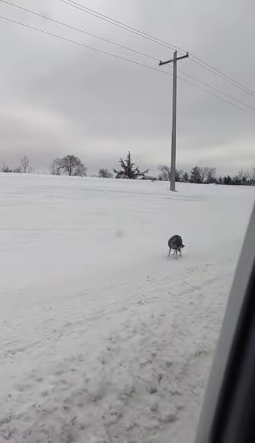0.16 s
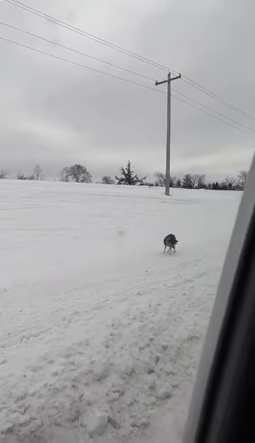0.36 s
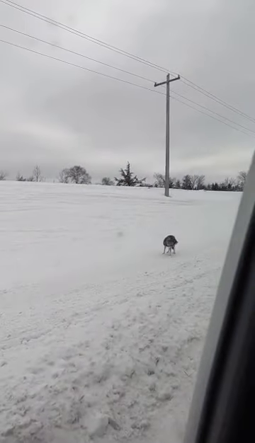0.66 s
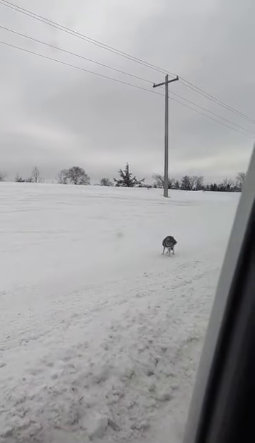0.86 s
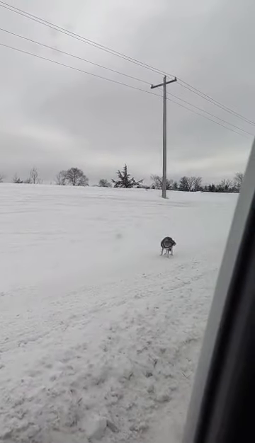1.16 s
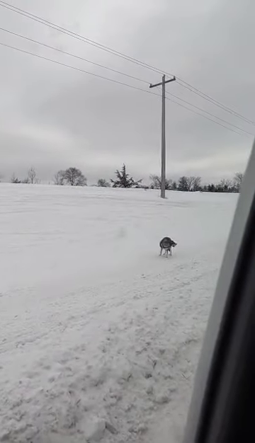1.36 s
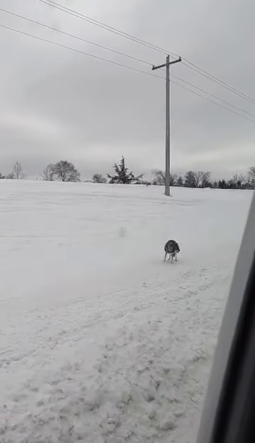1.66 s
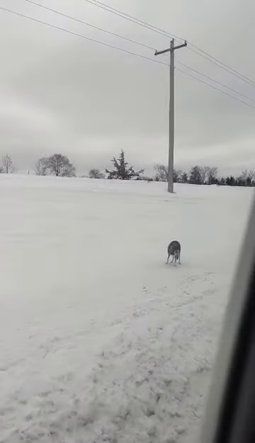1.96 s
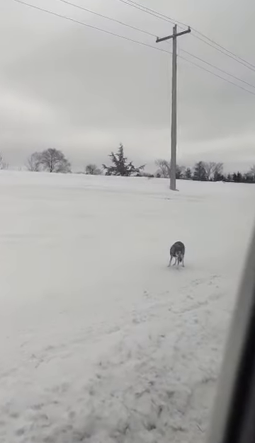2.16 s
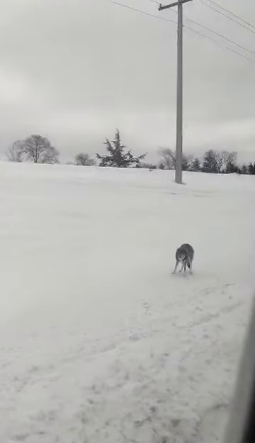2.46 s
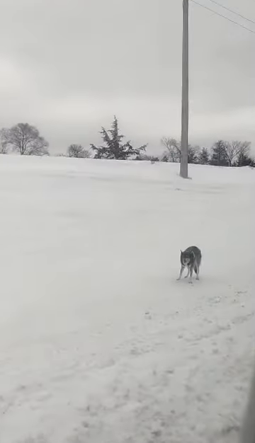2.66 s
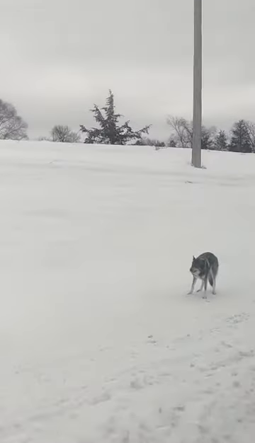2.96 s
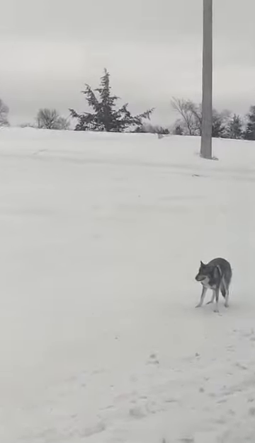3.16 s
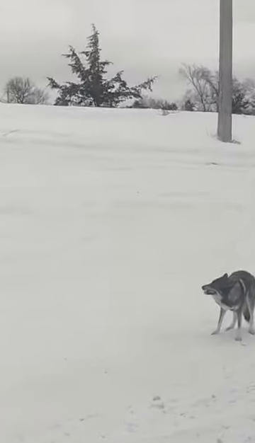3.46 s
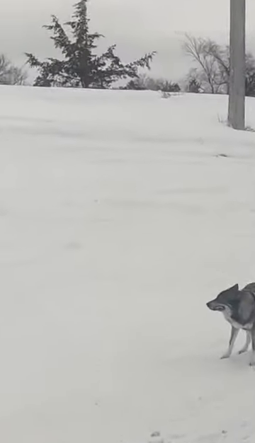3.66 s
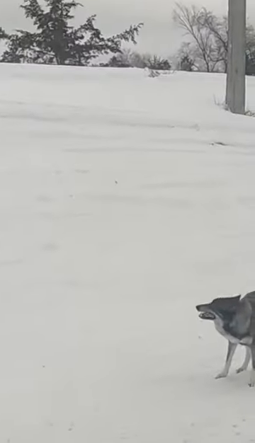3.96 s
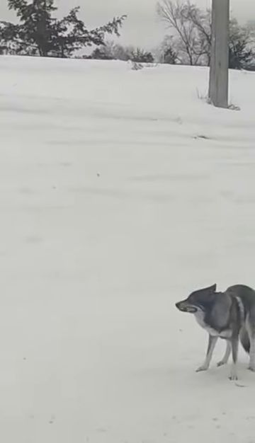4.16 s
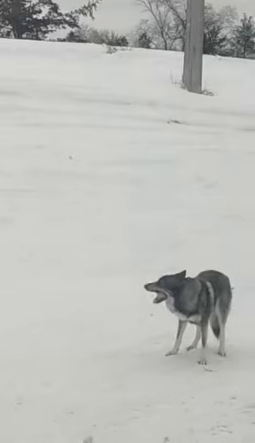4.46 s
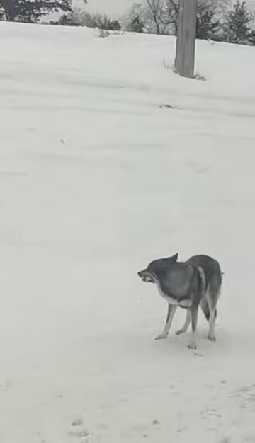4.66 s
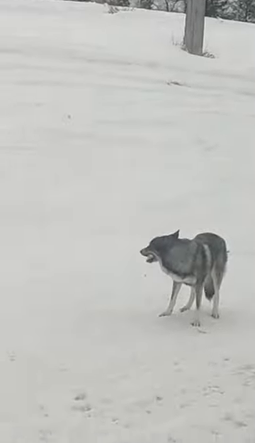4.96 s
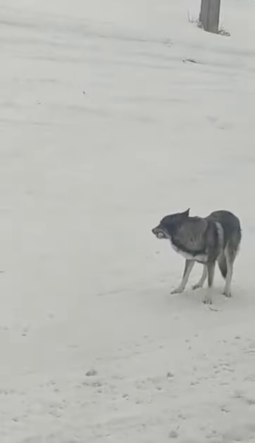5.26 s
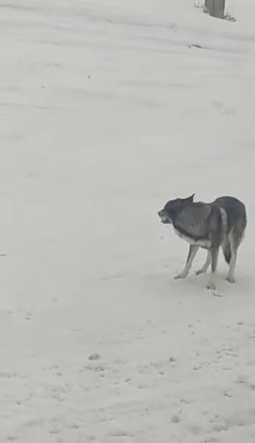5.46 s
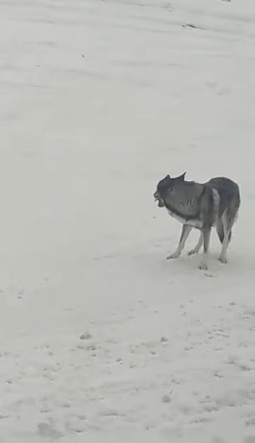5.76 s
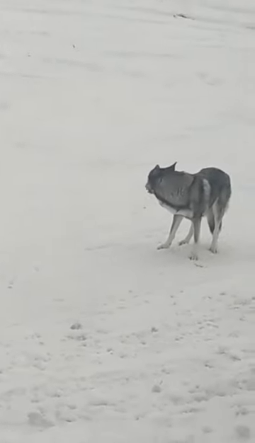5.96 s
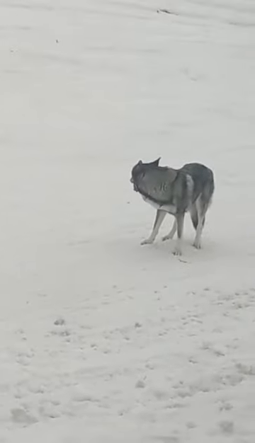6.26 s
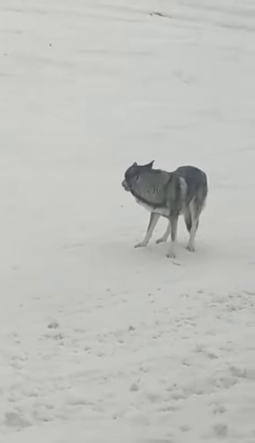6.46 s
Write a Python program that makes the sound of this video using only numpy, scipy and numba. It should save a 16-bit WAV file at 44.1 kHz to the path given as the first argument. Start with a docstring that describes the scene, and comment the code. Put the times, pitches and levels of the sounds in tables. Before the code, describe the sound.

A handheld phone in a car picks up a soft, muffled idle and very close handling noise: two bursts of deep bumps, gritty skin rubbing and a cluster of short squeaks, then a few last knocks. Road roar grows steadily outside the open window, peaks as a vehicle sweeps by with hissing wet tyres and low cabin boom, and fades, leaving light ticks and faint rubbing.

```python
"""Inside a parked car with a window open, the engine idles while hands rub and bump the case of a held phone.
Another vehicle comes along the road, roars past and fades, jolting the cabin with a few thumps. Shaped noise
makes its tyres, its spray and the idle; the cabin booms at its own resonances. Skin on the case is grainy
noise with ticks and gliding squeaks. Each bump or thump is a dying low swing plus a ringing."""
import sys
import numpy as np
from scipy import signal
from scipy.fft import rfft, irfft, next_fast_len
from scipy.io import wavfile
from scipy.ndimage import uniform_filter1d
from numba import njit

SR = 44100
rng = np.random.default_rng(int(sys.argv[2]) if len(sys.argv) > 2 else 0)


def store_wav(level_fs):
    """Save 16-bit WAV to argv[1]."""
    pcm = np.round(np.clip(np.atleast_2d(level_fs), -1, 1) * 32767)
    wavfile.write(sys.argv[1], SR, pcm.T.astype(np.int16))


N = 291501
T = np.arange(N) / SR
SIZE = next_fast_len(N, True)
HZ = np.fft.rfftfreq(SIZE, 1 / SR)
PORT_LAG_S = 14 / SR  # shared sound reaches the right port this much later


def undb(db):
    """Turn decibels into a plain amplitude factor."""
    return 10 ** (np.asarray(db) / 20)


def on_log_axis(table):
    """Read a (frequency [Hz], value) table at every frequency, in straight lines over log frequency."""
    hz, value = np.transpose(table)
    return np.interp(np.log(HZ + 0.0011), np.log(hz), value)


def unit(x):
    """Scale a sound to an RMS level of 1."""
    return x / np.sqrt(np.mean(x ** 2))


def walk(rate):
    """Wander at random: levels held 1 / rate seconds and smoothed twice, with a spread near 1."""
    hold = int(SR / rate)
    steps = np.repeat(rng.standard_normal(N // hold + 1), hold)
    smooth = uniform_filter1d(uniform_filter1d(steps, hold), hold)
    return 1.74 * smooth[:N]


@njit
def moving_band(x, hz, width):
    """State-variable band-pass filter whose centre moves; its gain is 1 at the centre."""
    y, band, low = np.empty(len(x)), 0., 0.
    for i in range(len(x)):
        g, k = np.tan(np.pi * hz[i] / SR), width / hz[i]
        v = (band + g * (x[i] - low)) / (1 + g * (g + k))
        band, low, y[i] = 2 * v - band, low + 2 * g * v, k * v
    return y


# How alike the sound is at the phone's two ports: (frequency [Hz], share common to both [0 to 1])
PORT_LIKENESS = [(20, 1), (250, 1), (500, 0.88), (1000, 0.64), (2000, 0.14), (13500, 0.33)]


def noise(gain):
    """Noise of a given spectrum at both ports: a shared part, later on the right, and a part of each port's own."""
    shared, left, right = rng.standard_normal((3, len(HZ), 2)) @ np.array([1, 1j]) * gain
    like = np.clip(on_log_axis(PORT_LIKENESS), 0, 1)
    late = np.exp(-2j * np.pi * HZ * PORT_LAG_S)
    common = np.sqrt(like) * np.array([shared, shared * late])
    own = np.sqrt(1 - like) * np.array([left, right])
    return unit(irfft(common + own, SIZE)[:, :N])


def patchy(gain, flicker_db, rate, slope_db=0):
    """Noise whose half-octave treble bands each flicker on their own, tilted by slope_db per octave above 2 kHz."""
    octaves = np.arange(0, 3, .5)  # band centres, counted up from 2 kHz
    distance = np.log2((HZ + 1) / 2000) - octaves[:, None]
    shares = np.exp(-8 * distance ** 2) + 1e-9
    spectrum = rfft(noise(gain), SIZE) / shares.sum(axis=0)
    out = np.zeros((2, N))
    for share, octave in zip(shares, octaves):
        band = irfft(spectrum * share, SIZE)[:, :N]
        out += band * undb(flicker_db * walk(rate) + slope_db * octave)
    return out


# Cabin air and panel resonances: (frequency [Hz], width [Hz], level [dB])
CABIN_RESONANCES = [(40.7, 11, -1.5), (82, 39, -5), (181.5, 79, 1.5), (180.6, 83, 2), (222, 46, -0.5),
                    (304.2, 49, -10), (355.6, 65, -0.5), (448, 140, -10), (637.6, 39, 2.5), (700, 50, -3.5),
                    (870, 30, -6), (868, 12, -10), (845, 25, 4.5), (1027, 20.5, 12), (1460, 330, -10.5),
                    (1623, 27, 3), (1977, 21, 2)]


def resonances(lo_hz, hi_hz):
    """Gain of the cabin resonances between two frequencies: each is a peak, and their powers add."""
    power = 0
    for hz, width, db in CABIN_RESONANCES:
        if lo_hz <= hz < hi_hz:
            power = power + undb(2 * db) / (1 + (2 * (HZ - hz) / width) ** 2) ** 2
    return np.sqrt(power)


# Colour of the idle before the cabin resonances: (frequency [Hz], level [dB per Hz])
IDLE_COLOUR = [(12, -52), (20, 7), (74, 7), (150, -0.5), (245, 5), (369, -9), (459, -10), (959, -25),
               (2560, -41), (3450, -28.5), (4180, -39.5), (10800, -46.5), (13500, -46)]
IDLE_DB = -47


def idle():
    """The idling engine hums in the panels over a faint outdoor hiss: noise lifted at the low cabin resonances."""
    colour = undb(on_log_axis(IDLE_COLOUR)) * (2.5 + resonances(20, 330))
    return noise(colour) * undb(IDLE_DB + 1.0 * walk(16))


# Colour of skin sliding on the case: (frequency [Hz], level [dB per Hz])
SKIN_COLOUR = [(710, -20), (1200, -8), (1360, -13), (1610, -2.5), (1930, 0), (2810, -1.5), (3270, -4),
               (6510, -1), (11900, -30), (13500, -33)]


def skin_noises():
    """Sliding skin gives a lower scrape and a higher hiss, parted near 3.3 kHz; the grip is noise around 900 Hz."""
    colour = undb(on_log_axis(SKIN_COLOUR))
    bright = 1 / (1 + (3300 / (HZ + 1)) ** 6)
    scrape = noise(colour * np.sqrt(1 - bright))
    hiss = noise(colour * np.sqrt(bright))
    grip = noise(1 / (1 + ((HZ - 900) / 500) ** 2))
    return scrape, hiss, grip


# Strokes of fingers over the case; the long faint ones are a hand shifting as it holds:
# (start [s], length [s], skin level [dB], grip noise against skin level [dB])
FINGER_STROKES = [(0.133, 0.051, -60.5, -1.5), (0.287, 0.2, -69, -11), (0.824, 1.7, -70, 1),
                  (0.84, 0.081, -61.5, 1), (0.913, 0.079, -56, 3.5), (1.16, 0.12, -56.5, -1.5),
                  (1.233, 0.031, -42, 1), (1.431, 0.088, -56, 0.5), (1.545, 0.086, -57.5, -2.5),
                  (1.798, 0.2, -53.5, -3), (2.001, .15, -42, -3), (2.155, 0.085, -40, -8),
                  (2.277, 0.063, -36, -10.5), (2.378, 0.026, -38, -2.5), (2.469, 0.19, -59, 5),
                  (2.632, 0.097, -54.5, 7), (2.77, 0.11, -47.5, 1.5), (2.955, 0.074, -50, -6),
                  (3.128, 0.019, -53.5, 13.5), (3.224, 0.025, -56, 10), (5.517, 0.043, -48, 2),
                  (5.64, 0.97, -67, -3)]
STROKE_ATTACK_S, STROKE_RELEASE_DB_PER_S = 0.028, 255


def stroke_gains():
    """Gains of skin and grip noise: each stroke presses on, holds and dies away."""
    skin_gain, grip_gain = np.zeros((2, N))
    for s, length, db, grip_db in FINGER_STROKES:
        press = np.clip((T - s) / STROKE_ATTACK_S, 0, 1)
        release_db = STROKE_RELEASE_DB_PER_S * np.maximum(T - s - length, 0)
        shape = press * undb(db - release_db)
        skin_gain += shape
        grip_gain += shape * undb(grip_db)
    return skin_gain, grip_gain


def strokes(scrape, hiss, grip):
    """Skin rubs in uneven grains; its ridges catch and let go in sparse slips that crackle."""
    skin_gain, grip_gain = stroke_gains()
    grains = scrape * undb(-9 + 3.5 * walk(60)) + hiss * undb(-8 + 3.5 * walk(60))
    # about 150 slips a second, each dying in a few ms
    slips = (rng.random(N) < 150 / SR) * undb(3.5 * rng.exponential(size=N))
    crackle = unit(signal.lfilter([1], [1, -np.exp(-1 / (0.0008 * SR))], slips))
    crackling = (scrape + hiss) * crackle * undb(-21.5)
    flickering = patchy(undb(on_log_axis(SKIN_COLOUR)), 5.3, 45.05) * undb(-5)
    rub = (grains + crackling + flickering) * skin_gain
    return rub + grip * grip_gain * undb(1.7 * walk(39.89))


# Ticks of slipping skin: (start [s], scrape level [dB], grip noise against scrape [dB],
# top hiss against scrape [dB], left minus right [dB])
SKIN_TICKS = [(.835, -40.5, -10, -22, 2), (0.8992, -52.5, -2, 5, 0), (.926, -46, 2, -7, 3),
              (0.9918, -50, -16, -5, 5), (1.0374, -55, 8, 3, 2), (1.25, -30, 5.5, -26, 4.5),
              (1.484, -58.5, -17, 10.5, 5), (1.573, -44.5, 1, -1, 2.5), (1.626, -56, -9, 5, -1),
              (1.678, -57.5, 16.5, -12, -3), (2.847, -39.5, -4, -1, -1), (3.058, -40.5, -5, 12.5, 1),
              (3.151, -41, 7, -4.5, -6), (4.174, -36, -2, -3, 3), (5.52, -45, -6, -2, -1),
              (5.529, -42, 0, 10, -2), (5.552, -47.5, 12.5, 14.5, -5), (5.586, -52, 13, -23, 4),
              (5.942, -50.5, 17.5, -30, 4), (5.954, -48.5, 12.5, -30, 0), (6.092, -57, 12.5, -3, -4)]
TICK_RISE_S, TICK_T60_S = 0.0016, 0.056  # T60: time to die by 60 dB


def ticks(scrape, hiss, grip):
    """Skin that slips ticks: a short burst of scrape, grip noise and hiss, stronger at one port or even."""
    out = np.zeros((2, N))
    t = T[:int(.25 * SR)]
    fade = (1 - np.exp(-t / TICK_RISE_S)) * 1000 ** (-t / TICK_T60_S)
    for s, db, grip_db, hiss_db, pan_db in SKIN_TICKS:
        at = slice(int(s * SR), int(s * SR) + len(t))
        side = undb(np.array([[pan_db], [-pan_db]]) / 2)
        burst = scrape[:, at] + undb(grip_db) * grip[:, at] + undb(hiss_db) * hiss[:, at]
        out[:, at] += undb(db) * fade * side * burst
    return out


# Skin squeaks: (start [s], length [s], first pitch [Hz], glide [octaves per s], level [dB])
SKIN_SQUEAKS = [(2.001, 0.025, 1910, 6.5, -43), (2.104, 0.056, 2710, 2.5, -42.5),
                (2.124, 0.034, 1605, -0.5, -41.5), (2.172, 0.026, 4300, -26, -43),
                (2.184, 0.022, 3010, -3, -40), (2.278, 0.038, 825, 7.5, -39.5),
                (2.279, 0.029, 2580, 13, -44), (2.304, 0.038, 2020, 13, -41),
                (2.317, 0.035, 800, -12, -46.5), (2.349, 0.026, 2500, 8.5, -45.5),
                (2.403, 0.0273, 2304, .1, -36.5)]


def squeaks():
    """Skin that sticks squeaks: a short tone that glides and wobbles in pitch, swelling and fading."""
    out = np.zeros(N)
    wobble, flutter = 1 + 0.031 * walk(200), undb(0.89 * walk(250))
    for s, length, first_hz, glide, db in SKIN_SQUEAKS:
        at = slice(int(s * SR), int((s + length) * SR))
        swell = np.sin(np.pi * (T[at] - s) / length)
        hz = first_hz * 2 ** (glide * (T[at] - s)) * wobble[at]
        tone = np.sin(2 * np.pi * np.cumsum(hz) / SR)
        out[at] += undb(db) * flutter[at] * swell * tone
    return out


def fingers():
    """Fingers slide on the case: strokes and ticks share the same skin noises, and squeaks join them."""
    skin = skin_noises()
    return strokes(*skin) + ticks(*skin) + squeaks()


# What the case rings with; the cabin thumps use it too:
# (frequency [Hz], level [dB], time to die by 60 dB [s])
CASE_RING = [(152, -5.5, 0.16), (207, -0.5, 0.064), (300, 1.5, 0.042), (427, 1.5, 0.018),
             (645, -20.5, 0.086), (1220, -19.5, 0.033)]
# Bumps of the phone in the grip; those at 4.504, 4.56 and 4.871 s are thumps of the cabin,
# jolted as the vehicle passes: (start [s], swing level [dB], swing pitch [Hz],
# time for the swing to die by 60 dB [s], hardness: ring against swing [dB])
BUMPS_AND_THUMPS = [(.149, -26.5, 75.2, 0.36, -10.5), (0.189, -27, 64.3, 0.25, -29),
                    (0.206, -21, 61, 0.13, -28), (0.551, -33.5, 168, 0.063, 0.5),
                    (.693, -33.5, 54.7, 0.35, -15), (0.744, -34, 46.7, 0.16, -22.5),
                    (.859, -31.5, 152, 0.12, -2), (0.884, -30.5, 50.7, .22, -9),
                    (0.919, -27.5, 58, .16, -4), (.947, -2, 80.3, .17, -20), (.971, -15.5, 36.3, 0.28, -18),
                    (.982, -6.5, 116, 0.064, -22.5), (1.044, -19.5, 32.7, .18, -11),
                    (1.134, -31, 31.2, 0.93, -20), (1.246, -15.5, 300, 0.024, -0.5),
                    (1.252, -4.5, 219, 0.1, 2), (1.262, -9.5, 298, 0.097, -6), (1.27, -12, 57.7, .14, -3),
                    (1.288, -2.5, 80, .07, -14), (1.305, -3, 70.4, .06, -17), (1.328, -10.5, 55.4, .11, -8),
                    (1.362, -10, 74, 0.042, -20.5), (1.482, -28.5, 198, 0.093, 3), (2, -31, 328, 0.12, 2),
                    (2.087, -21.5, 94.2, 0.15, -5), (2.113, -15.5, 88, .1, -6),
                    (2.134, -26, 73.3, 0.33, -9), (2.162, -24, 66, 0.15, -7.5),
                    (2.188, -23.5, 81, 0.076, -7), (2.218, -28, 138, 0.12, -3),
                    (2.413, -22.5, 268, 0.12, 0), (2.43, -19, 125, .06, -4.5), (2.783, -32, 200, 0.056, -2),
                    (2.849, -33, 239.5, .15, 6.5), (3.062, -17.5, 208, 0.11, -7.5),
                    (3.08, -21.5, 74, 0.18, -10), (3.162, -10.5, 80.4, 0.091, -16),
                    (3.18, -17, 48, 0.18, -33), (4.504, -15, 186, 0.17, -13), (4.56, -19, 45.7, 0.4, -30),
                    (4.871, -13.5, 210, 0.23, -23.5), (5.55, -33, 237, 0.19, 7)]
RATTLE_DB, RATTLE_T60_S = -31, 0.082  # level against the push


def bumps_and_thumps():
    """The phone bumped in the grip, or the cabin jolted, swings and dies away; a push and a rattle excite a ring."""
    swing, force = np.zeros((2, N))
    rattle = rng.standard_normal(N)
    t = T[:int(.4 * SR)]
    for s, db, hz, t60, ring_db in BUMPS_AND_THUMPS:
        at = slice(int(s * SR), int(s * SR) + len(t))
        rise = 1 - np.exp(-(6.0 * hz * t) ** 2)  # a soft start; in the grip, flesh gives way first
        swing[at] -= undb(db) * rise * np.sin(2 * np.pi * hz * t) * 1000 ** (-t / t60)
        contact_s = 0.054 / hz  # a lower pitch, as of a looser grip, gives a longer, duller push
        push = np.exp(-(t / contact_s - 3) ** 2) / (contact_s * SR * 4)
        shaking = undb(RATTLE_DB) * rattle[at] * 1000 ** (-t / RATTLE_T60_S)
        force[at] += undb(db + ring_db) * (push + shaking)
    ring = sum(undb(db) * np.sin(2 * np.pi * hz * t) * 1000 ** (-t / t60) for hz, db, t60 in CASE_RING)
    left = swing + signal.fftconvolve(force, ring)[:N]
    right = np.interp(T - PORT_LAG_S, T, left)
    return np.array([left, right])


PASSES_S, SPEED_M_S, KERB_M = 4.653, 24.9, 2.99  # closest moment, speed, closest distance
CLEARS_S, CLEARS_FADE_S = 1.5, 0.59  # the vehicle comes out from behind a rise in the road


def heard(closest_db, loss_db_per_m, hidden_db, shaded_s, fade_s, shade_db):
    """Level of a passing sound: spreading, loss over the snow, the rise in front and the car's body behind."""
    distance_m = np.hypot(SPEED_M_S * (T - PASSES_S), KERB_M)
    hidden = .5 - .5 * np.tanh((T - CLEARS_S) / CLEARS_FADE_S)
    shade = .5 + .5 * np.tanh((T - shaded_s) / fade_s)  # the parked car's body shades the window
    spread_db = 20 * np.log10(distance_m / KERB_M)
    snow_db = loss_db_per_m * (distance_m - KERB_M)
    return closest_db - spread_db - snow_db - hidden_db * hidden - shade_db * shade


# Colour of the tyre roar before the cabin resonances: (frequency [Hz], level [dB per Hz])
ROAR_COLOUR = [(250, -28), (330, -1), (520, -1), (650, 2.5), (800, -6.5), (1000, -7.5), (1400, -3),
               (1960, -9), (2600, -20.5), (3500, -45), (5000, -53)]
TREAD_HZ, TREAD_WIDTH_HZ = 969, 430.0  # centre of the tread peak, and width of each filter pass
TREAD_DROP = 0.13  # share by which the tread peak is higher coming and lower going
TREAD_COMING_DB, TREAD_GOING_DB = 4, -2  # against the roar
TREAD_LEAD_S = .2  # the front tyres pass this much ahead of the middle


def tyres(roar_db):
    """Tyres roar through the window, coloured by the cabin, with a tread peak that drops as they go by."""
    along_m = SPEED_M_S * (T - PASSES_S + TREAD_LEAD_S)
    going = along_m / np.hypot(along_m, KERB_M)  # from -1 coming to 1 going
    tread_hz = TREAD_HZ * (1 - TREAD_DROP * going) * (1 + 0.02 * walk(5.12))
    tread_db = np.interp(going, [-1, 1], [TREAD_COMING_DB, TREAD_GOING_DB])
    roar = noise(undb(on_log_axis(ROAR_COLOUR)) * (.5 + resonances(330, 3000)))
    tread = noise(1)
    for _ in range(2):
        tread = np.array([moving_band(port, tread_hz, TREAD_WIDTH_HZ) for port in tread])
    both = roar * undb(1.45 * walk(25)) + unit(tread) * undb(tread_db + 1.4 * walk(25))
    return both / np.sqrt(1 + undb(2 * tread_db)) * undb(roar_db)


# How hard the cabin is shaken, most just after the vehicle is past:
# (time [s], boom level [dB], rumble level [dB])
CABIN_SHAKE = [(.6, -62, -58), (1.1, -48, -43), (1.8, -48, -49), (2.55, -47, -44.5), (3.2, -52, -49),
               (3.8, -41.5, -46), (4.2, -34.5, -42.5), (4.55, -32, -30), (4.72, -22.5, -26.5),
               (4.9, -23.5, -30.5), (5.08, -33.5, -31), (5.2, -41.5, -36), (5.35, -47, -41),
               (5.6, -50.5, -44), (6.1, -56, -47.5), (6.61, -47.5, -51.5)]


def cabin_shake():
    """The cabin booms at its 130-330 Hz resonances and rumbles at those below, each with a wavering level."""
    s, boom_levels, rumble_levels = np.transpose(CABIN_SHAKE)
    boom_db = np.interp(T, s, boom_levels) + 2.5 * walk(18)
    rumble_db = np.interp(T, s, rumble_levels) + 2.7 * walk(8.4)
    return noise(resonances(130, 330)) * undb(boom_db) + noise(resonances(20, 130)) * undb(rumble_db)


# Colour of the spray: (frequency [Hz], level [dB per Hz])
SPRAY_COLOUR = [(1290, -10.5), (2200, -3.5), (2450, -9.5), (3140, -7.5), (5110, -13.5), (6460, -8),
                (7080, -10.5), (8690, -28.5), (12600, -33), (13500, -89)]
AIR_LOSS = 0.098  # dB lost per octave of treble for each dB that the roar is below its loudest


def spray(roar_db):
    """Spray hisses in flickering treble bands, duller whenever the roar is weaker."""
    spray_db = heard(closest_db=-30, loss_db_per_m=0.17, hidden_db=1, shaded_s=5, fade_s=0.17, shade_db=12)
    slope_db = AIR_LOSS * (roar_db - roar_db.max())
    return patchy(undb(on_log_axis(SPRAY_COLOUR)), 2.5, 45, slope_db) * undb(spray_db)


def passing():
    """The vehicle goes by: tyre roar and spray follow its distance, and boom and rumble ride along."""
    roar_db = heard(closest_db=-19, loss_db_per_m=0.09, hidden_db=11.5, shaded_s=5, fade_s=0.1, shade_db=6)
    return tyres(roar_db) + cabin_shake() + spray(roar_db)


def scene():
    """Add up the idle, the fingers, the bumps and thumps, and the passing vehicle."""
    return idle() + fingers() + bumps_and_thumps() + passing()


# How the two ports differ in colour: (frequency [Hz], left minus right [dB])
PORT_COLOUR = [(100, 0.5), (300, 0), (500, 2), (1190, 2.5), (2170, 6.5), (3940, -0.5), (7170, 0.5),
               (9000, 1), (13000, 4.5)]
TOP_HZ = 13350


def record(dry):
    """The ports differ in colour, the loudest peaks are rounded off and the top is cut steeply."""
    tilt = on_log_axis(PORT_COLOUR) / 2
    wet = irfft(rfft(dry, SIZE) * undb(np.array([tilt, -tilt])), SIZE)[:, :N]
    rounded = .9 * np.tanh(wet / .9)
    top_cut = signal.ellip(10, .2, 70, TOP_HZ, fs=SR, output="sos")
    return signal.sosfilt(top_cut, rounded)


dry = scene()
out = record(dry)
store_wav(out)
```